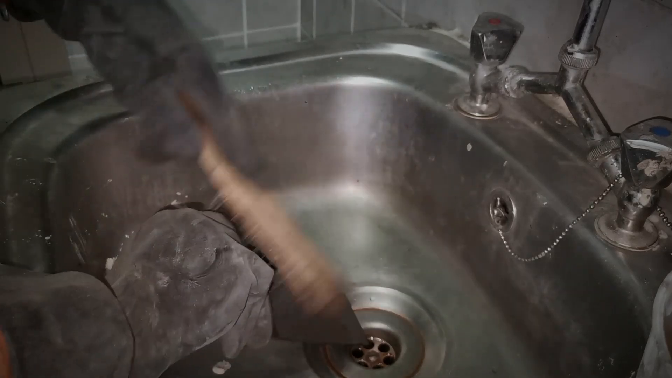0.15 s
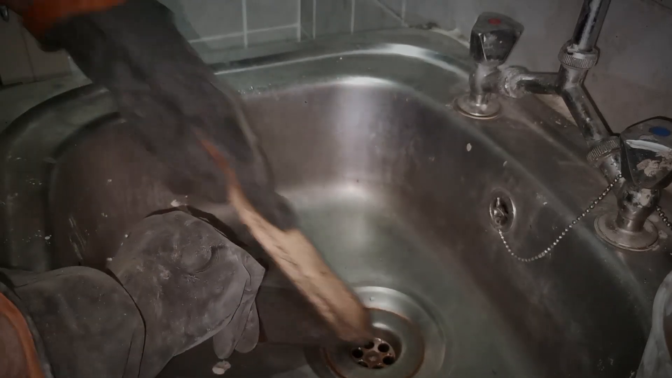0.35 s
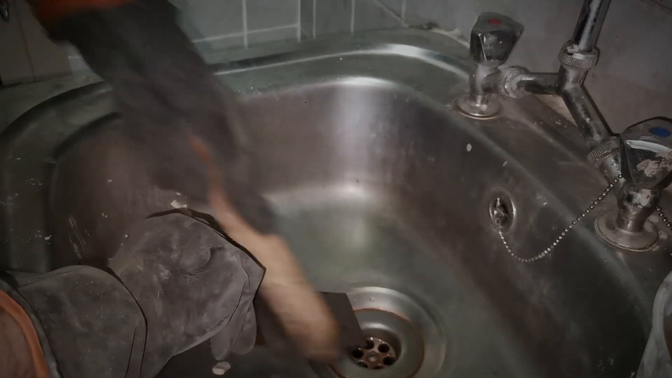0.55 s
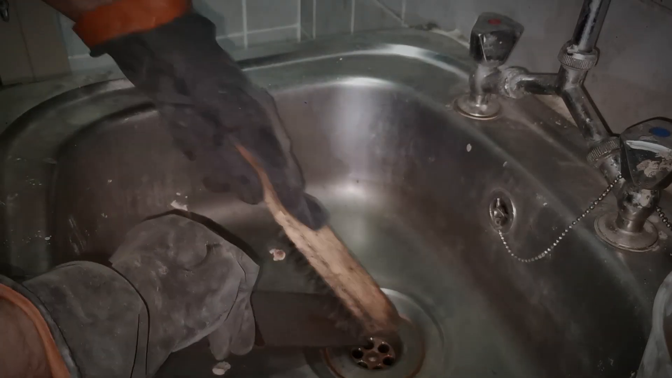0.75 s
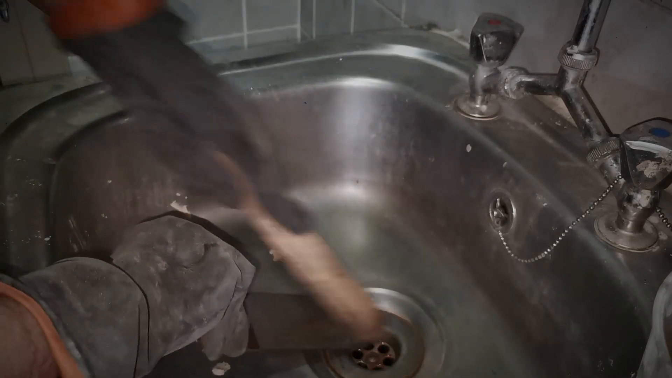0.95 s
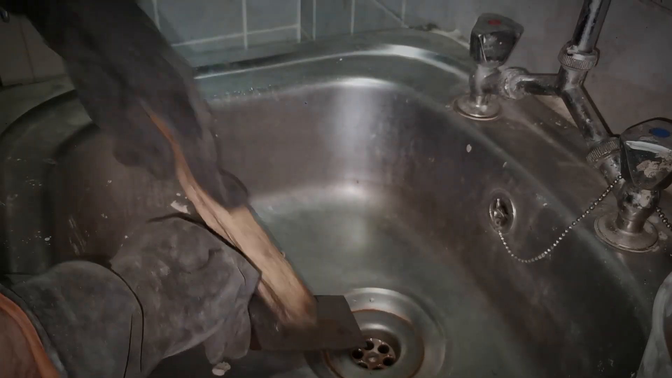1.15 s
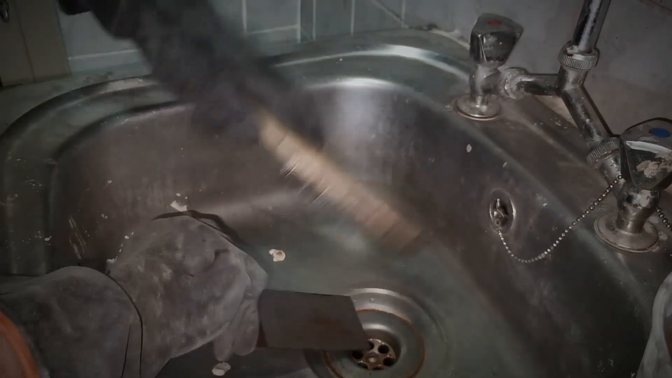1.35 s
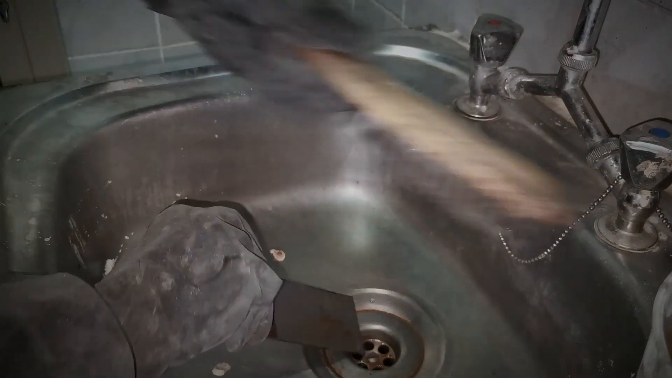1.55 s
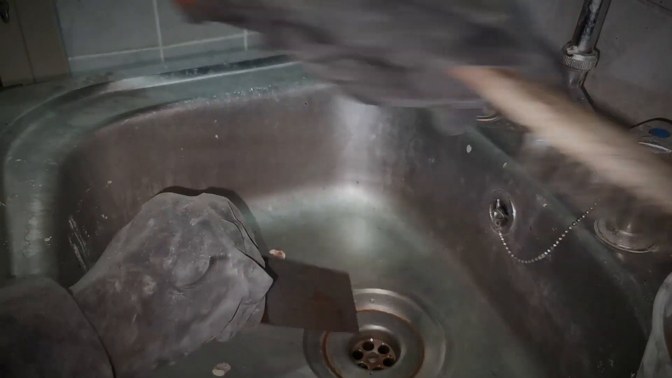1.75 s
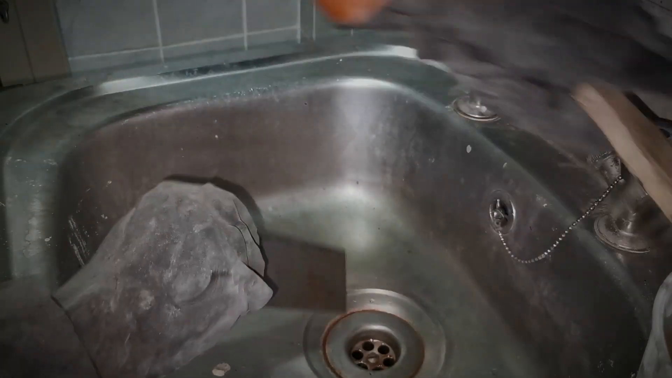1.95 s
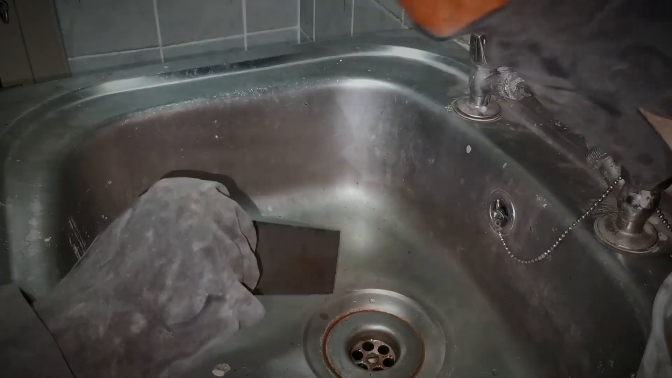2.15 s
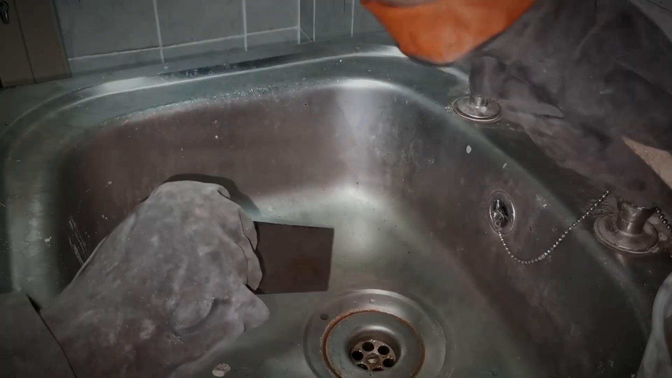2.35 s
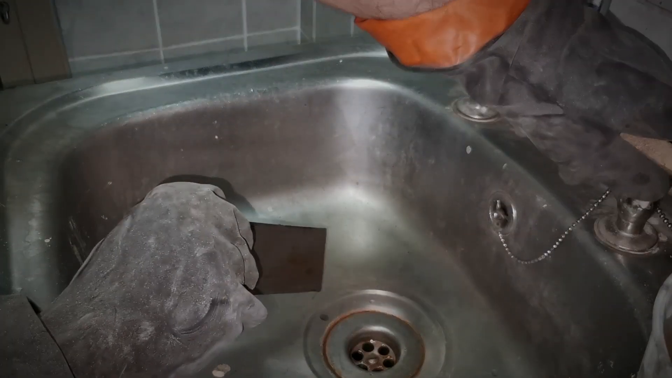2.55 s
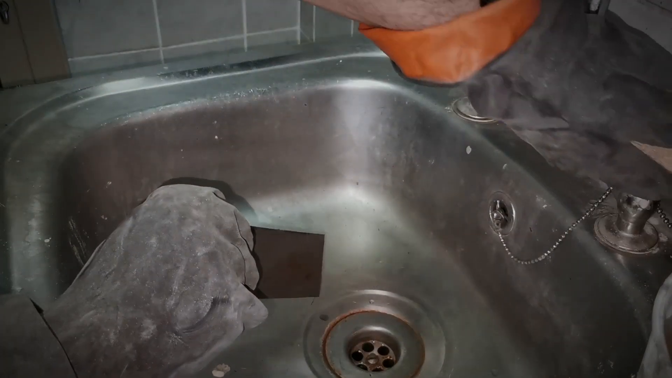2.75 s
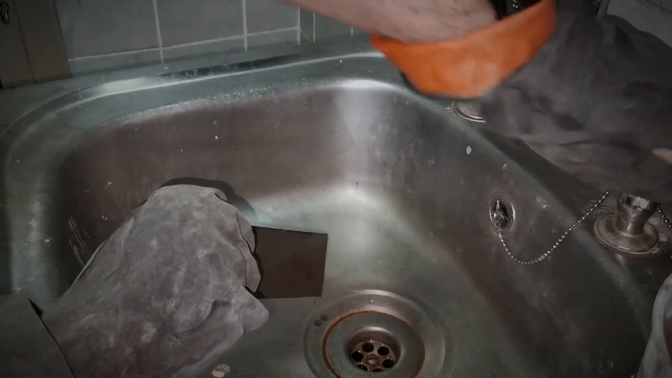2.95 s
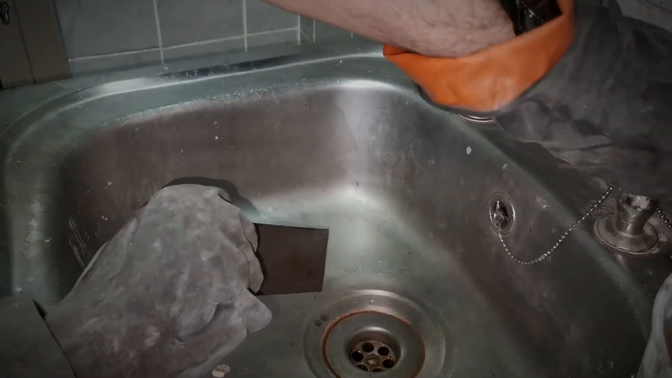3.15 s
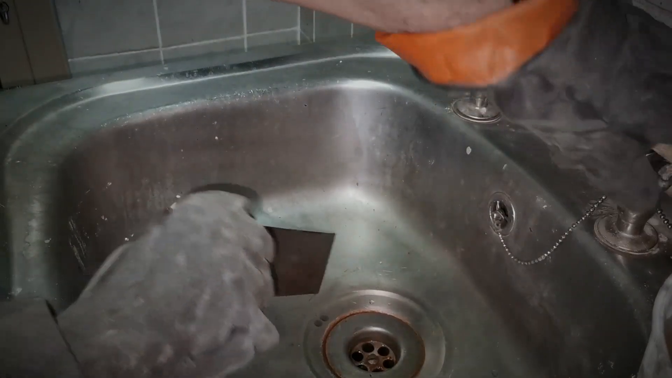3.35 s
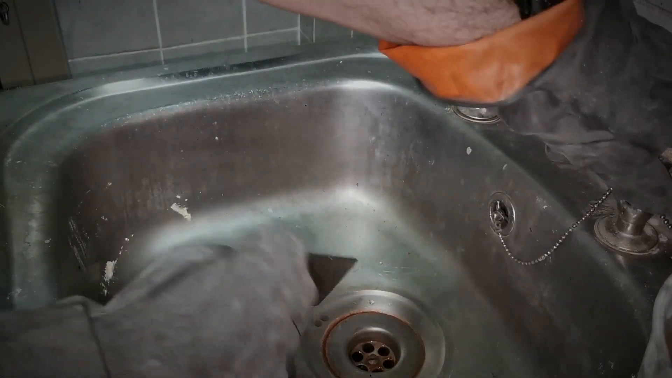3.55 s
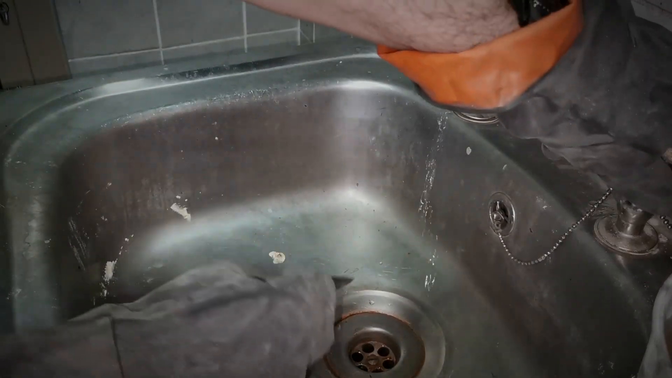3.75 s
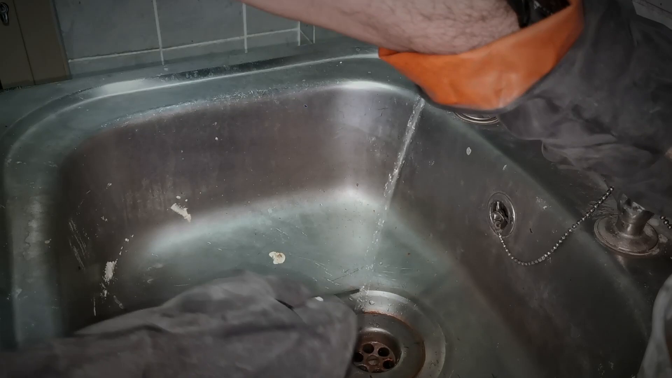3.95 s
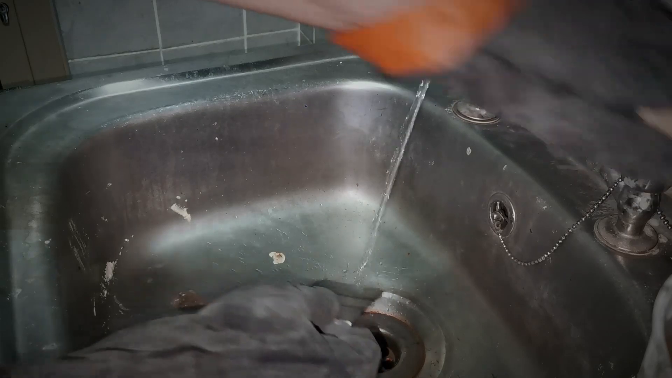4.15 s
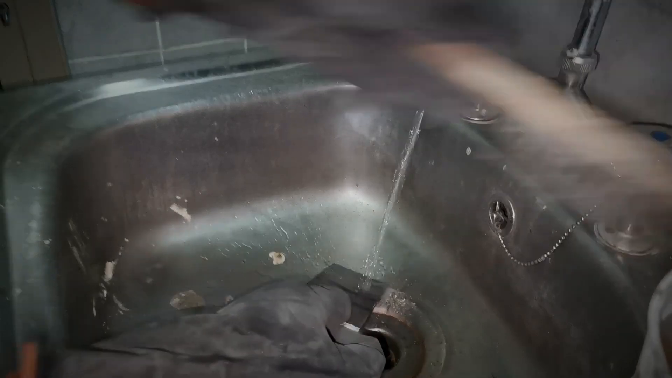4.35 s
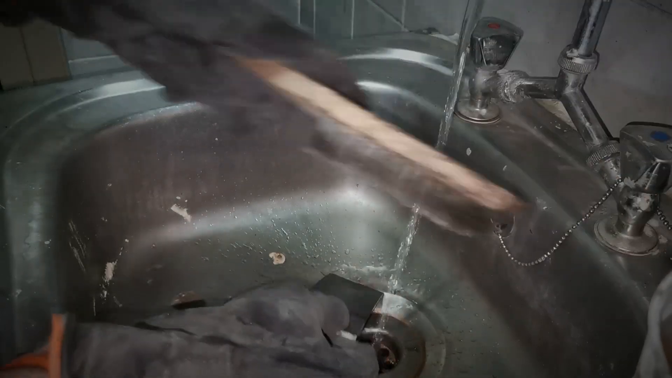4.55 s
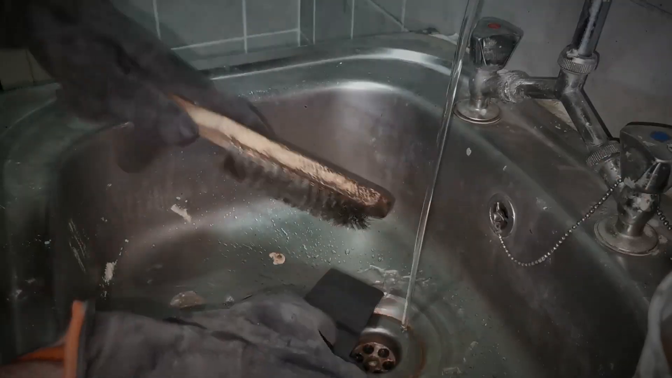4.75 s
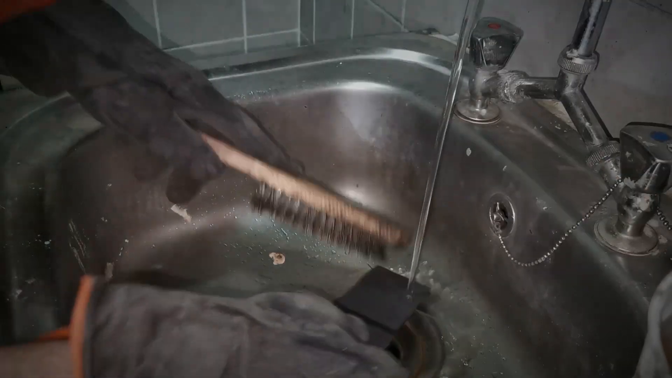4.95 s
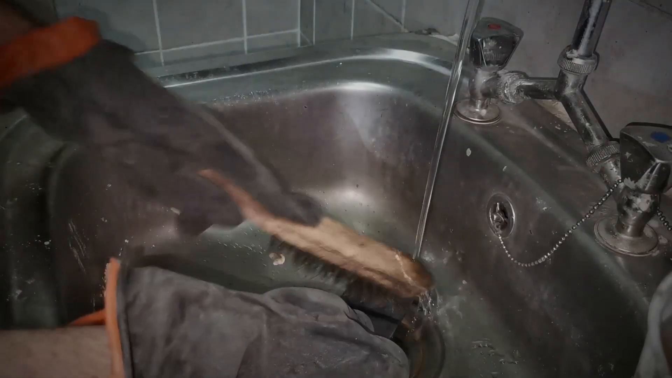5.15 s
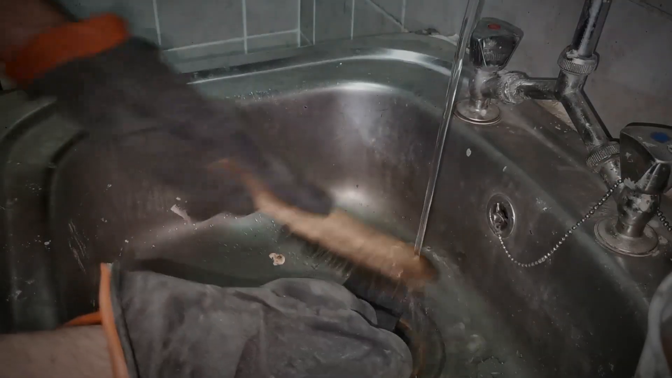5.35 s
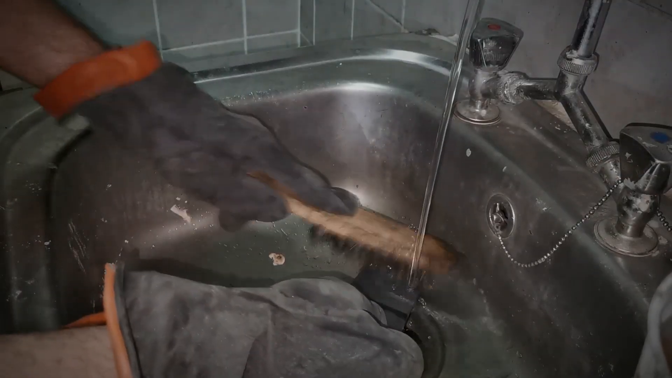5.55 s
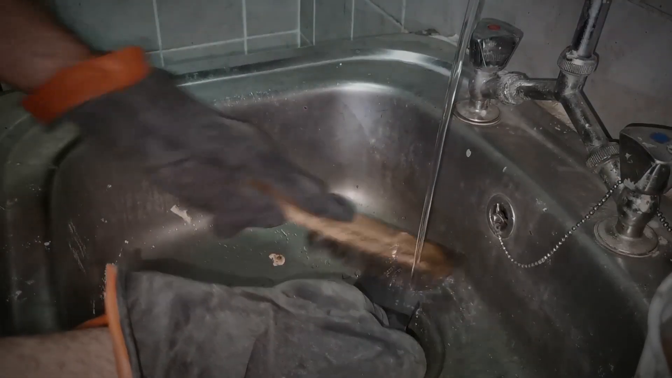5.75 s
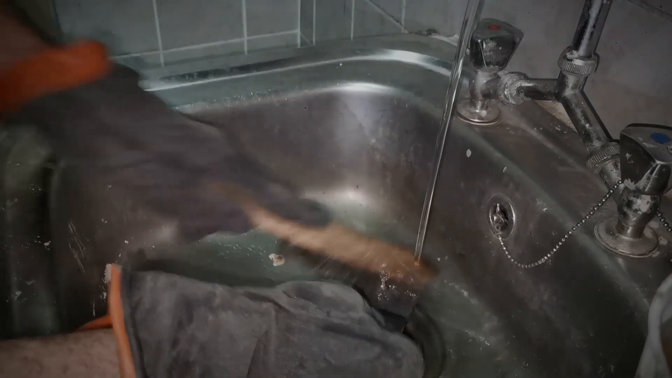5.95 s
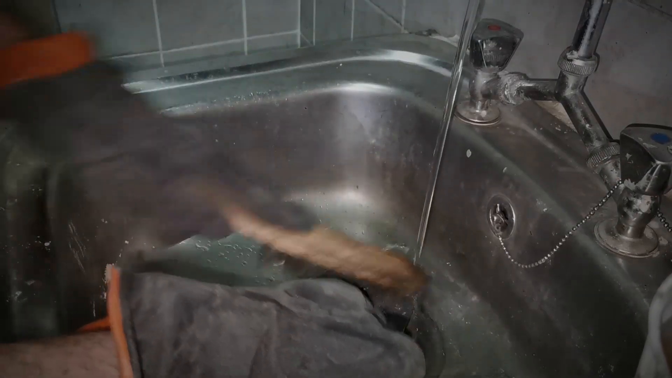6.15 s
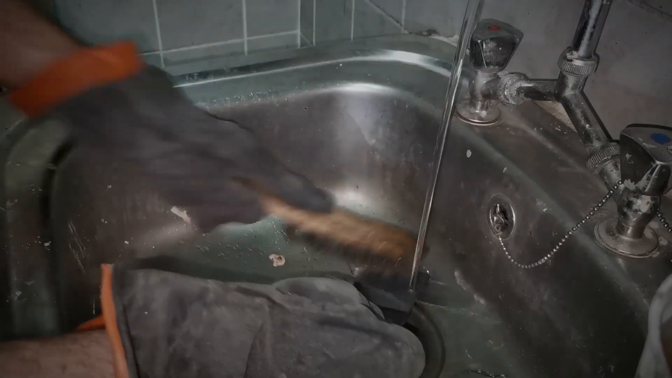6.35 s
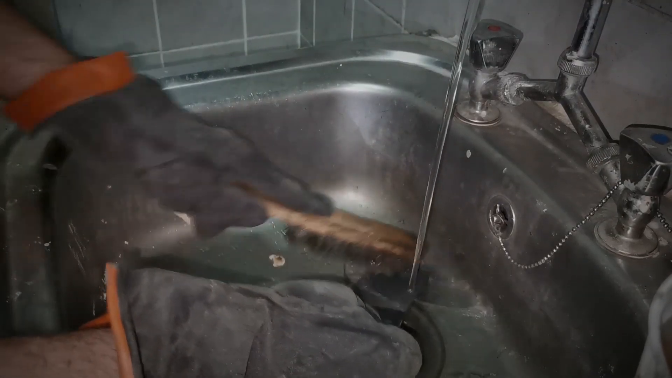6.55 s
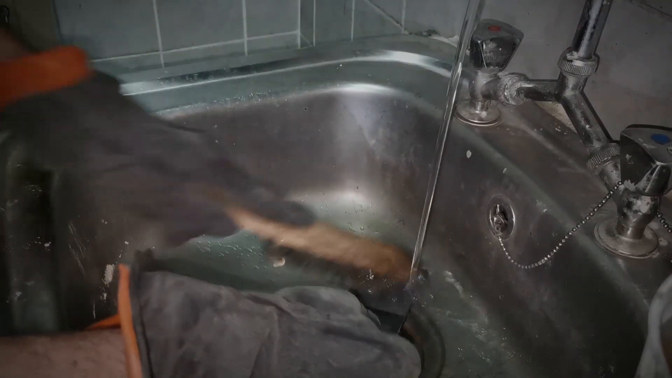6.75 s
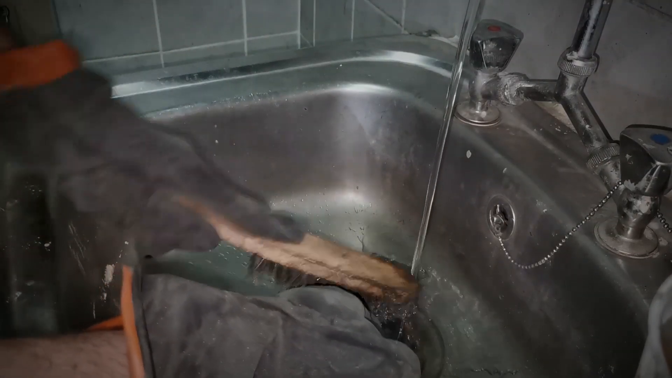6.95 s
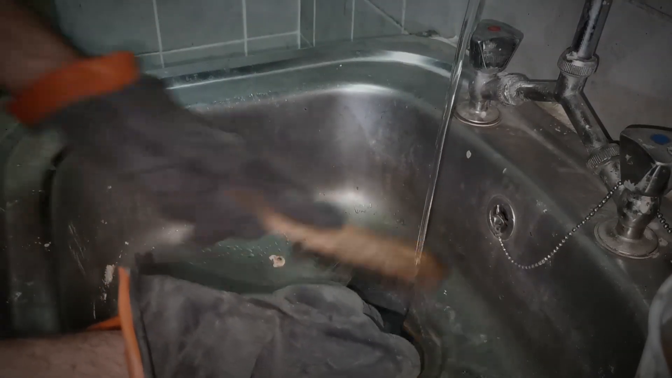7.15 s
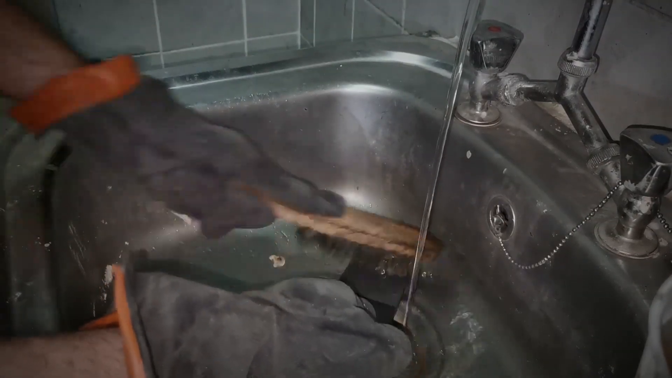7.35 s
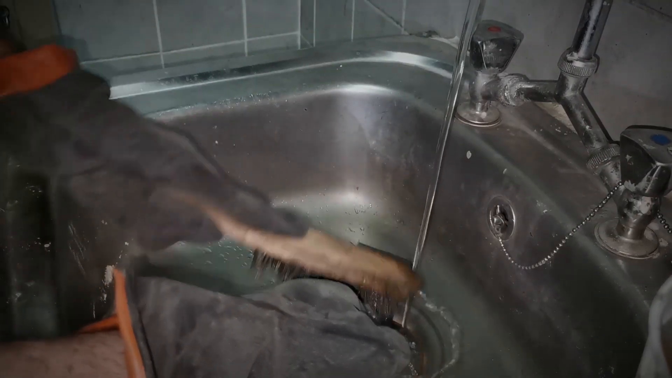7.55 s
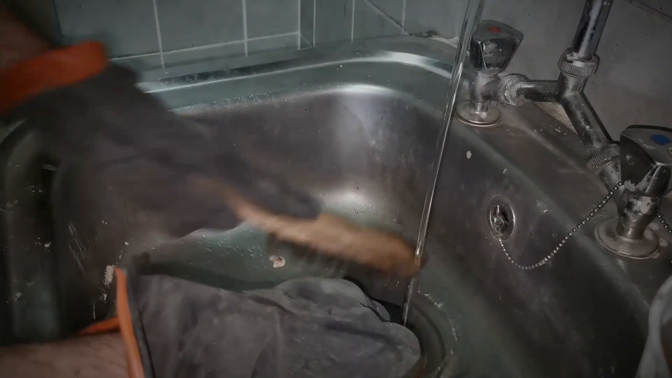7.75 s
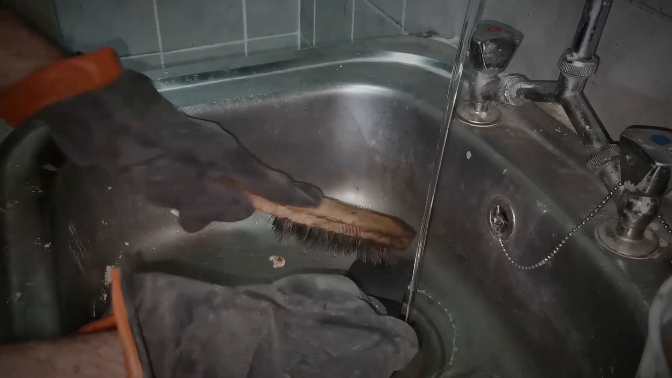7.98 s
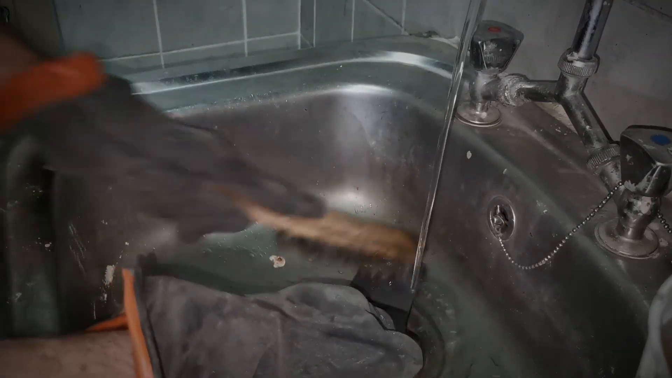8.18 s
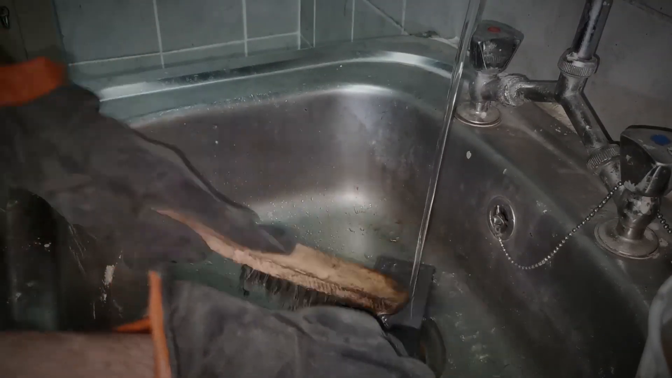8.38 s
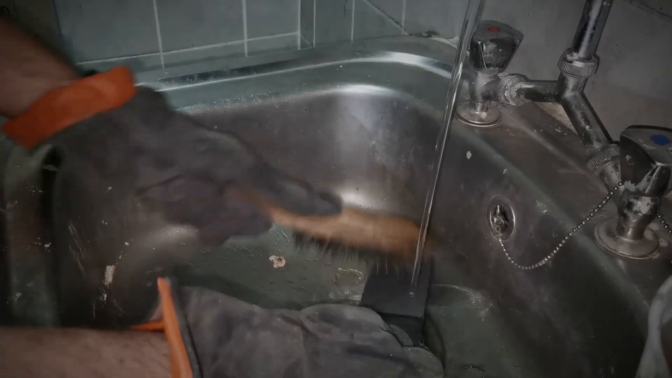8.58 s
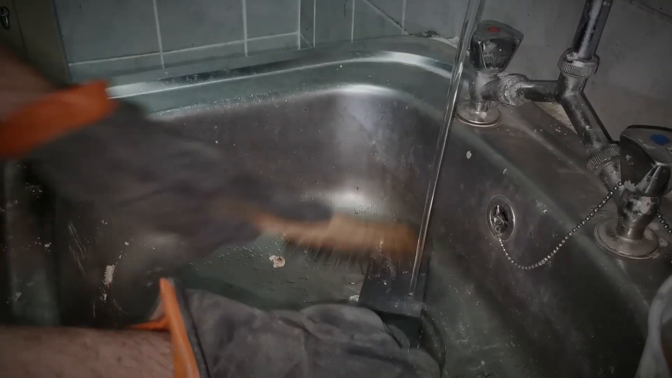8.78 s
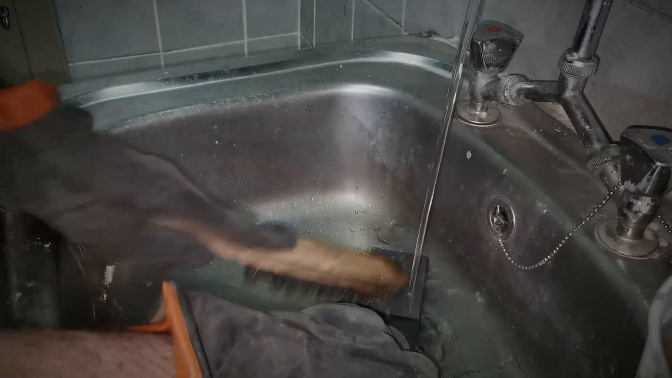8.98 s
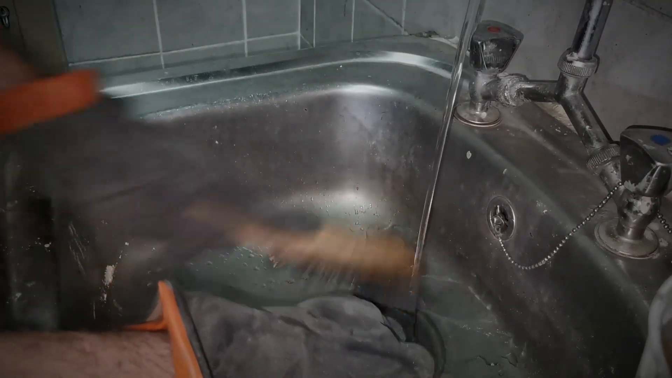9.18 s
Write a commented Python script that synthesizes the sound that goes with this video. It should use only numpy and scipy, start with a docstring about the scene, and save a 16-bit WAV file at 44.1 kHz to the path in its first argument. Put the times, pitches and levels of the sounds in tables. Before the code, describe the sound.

A close stereo microphone hears a steel sink in a small tiled room with low rumble. At about 0.2 s a strong hollow knock lands, then from 0.35 to 1.45 s seven dry wire-brush strokes rasp over a steel plate, hissing brightly while the basin drums beneath, with a tiny squeal near 0.75 s. A quieter pause follows: gloves rustle, the plate slides around 2.1 to 2.6 s, and a dull clunk sounds at 3.1 s. At 4.07 s a thin tap stream begins pattering and stays on. A scrape at 4.4 s, a hard knock at 4.65 s, a sharp tick at 4.8 s and another bang near 5.15 s lead into steady scrubbing from 5.3 s to the end, about seven or eight strokes a second, heaviest around 7.3 s, with brief wire squeals, ticks and small basin bumps.

```python
"""Wire brush on steel in a sink

Tiled room, a stainless sink at close range, two microphone ports: a gloved hand scrubs a small steel plate.
Wire tips catch and snap free as coloured noise grains, a few squeal as sines, and the plate drums the basin's
modes. In the pause gloves rustle, the plate slides and knocks, and the tap opens to a thin stream that then
stays on. Filtered noise makes the short ring of the tiles and a low background rumble."""
import sys
import numpy as np
from scipy import signal
from scipy.fft import rfft, irfft
from scipy.io import wavfile
from scipy.ndimage import uniform_filter1d, map_coordinates

SR = 44100
rng = np.random.default_rng(int(sys.argv[2]) if len(sys.argv) > 2 else 0)


def materialize(psi):
    """Save the field psi as 16-bit PCM at rate SR to the path in sys.argv[1].

    A 1-D psi becomes a single channel; in a 2-D psi each row is a channel.
    """
    bounded = np.clip(np.atleast_2d(psi).T, -1, 1)
    quanta = np.round(bounded * 32767).astype(np.int16)
    wavfile.write(sys.argv[1], SR, quanta)


N = 406602
TIME = np.arange(N) / SR  # [s]
HALF_SECOND = SR // 2  # length of every impulse response [samples]


def amp(db):
    """Amplitude factor of a level in dB."""
    return 10 ** (np.asarray(db) / 20)


def unit(x):
    """Scale to rms 1."""
    return x / np.sqrt(np.mean(x ** 2))


def blow_unit(x):
    """Scale so that the first twentieth of a second has rms 1."""
    return x / np.sqrt(np.mean(x[..., :SR // 20] ** 2))


def unit_energy(response):
    """Scale a stereo response so that it keeps the level of noise."""
    return response / np.sqrt(np.sum(response ** 2) / 2)


def through(x, response):
    """Play a sound through an impulse response."""
    return signal.oaconvolve(np.atleast_2d(x), np.atleast_2d(response), axes=-1)[:, :x.shape[-1]]


def colour(x, spectrum, size=4096):
    """Causal minimum-phase filter with a (frequency [Hz], level [dB]) spectrum."""
    hz, db = np.transpose(spectrum)
    grid = np.maximum(np.fft.rfftfreq(size, 1 / SR), 1)
    level_db = np.interp(np.log(grid), np.log(hz), db)
    # folding the cepstrum forward in time makes the filter causal
    cepstrum = irfft(np.log(amp(level_db)))
    cepstrum[1:size // 2] *= 2
    cepstrum[size // 2 + 1:] = 0
    return through(x, irfft(np.exp(rfft(cepstrum))))


def fade(t60):
    """Half a second of exponential decay, falling 60 dB in t60 seconds."""
    return np.exp(-np.log(1000) * TIME[:HALF_SECOND] / t60)


def ring(modes):
    """Impulse response of a set of modes, each a decaying sine."""
    return sum(amp(db) * fade(t60) * np.sin(2 * np.pi * hz * TIME[:HALF_SECOND]) for hz, db, t60 in modes)


def wash(t60):
    """Countless overlapping modes and echoes as fading noise, different at each port; mean energy 1."""
    x = rng.standard_normal((2, HALF_SECOND)) * fade(t60)
    return unit_energy(x)


def snaps(rate, spread_db):
    """Random tiny impacts of uneven size and either sign, rate per second; rms 1."""
    size = amp(spread_db * np.minimum(rng.exponential(size=N), 4))
    struck = rng.random(N) < rate / SR
    return unit(struck * size * rng.choice([-1, 1], N))


def grains(rate, spread_db, t60):
    """Each tiny impact sets off its own short burst of noise, different at the two ports; rms 1."""
    power = through(snaps(rate, spread_db) ** 2, fade(t60) ** 2)
    return unit(np.sqrt(np.abs(power)) * rng.standard_normal((2, N)))


def walk(rate):
    """Random wander with a spread near 1, rate steps per second; after 4096 steps it holds still."""
    knots = rng.standard_normal(4096)
    return np.interp(TIME * rate, np.arange(len(knots)), knots)


def roam(x, depth_db, rate, per_octave, size=512):
    """As the contact point moves, it favours now one group of resonances, now another; rms 1."""
    hz, s, frames = signal.stft(x, SR, nperseg=size)
    place = np.meshgrid(per_octave * np.log2(1 + hz / 50), rate * s, indexing="ij")
    shift = map_coordinates(rng.standard_normal((128, 512)), place, order=1, mode="wrap")
    favoured = frames * amp(depth_db * np.clip(shift, -2, 1))
    return unit(signal.istft(favoured, SR, nperseg=size)[1][:, :N])


def arch(length, peak):
    """Swell from rest to 1 and back, highest at the given share of its length [s]."""
    u = np.linspace(0, 1, max(int(length * SR), 8))
    bend = np.log(.5) / np.log(np.clip(peak, .1, .9))
    return np.abs(np.sin(np.pi * u ** bend))


def add(out, s, x):
    """Mix x in at time s."""
    i = max(int(s * SR), 0)
    out[..., i:i + x.shape[-1]] += x[..., :max(N - i, 0)]


# modes of the steel basin: (frequency [Hz], relative level [dB], t60 [s])
BASIN_MODES = [(69.5, 1, 0.61), (134.7, 3.5, 0.22), (185, -4, 0.097), (223, 4.5, 0.19), (250, 2, 0.18),
               (294.5, -0.5, 0.28), (328, -24.5, 0.044), (412.5, -5.5, 0.25), (475, -22, 0.31),
               (528.5, -10, 0.2), (598.4, -14, 0.18), (662.5, -7.5, 0.15), (706, -7.5, 0.39),
               (666, -8, 0.13), (770, -59.5, 0.35), (870, -36.5, 0.11), (903, -21.5, 0.089),
               (962, -26, 0.45), (1119, -14, 0.23), (1370, -13, .22), (1512, -20.5, 0.65),
               (1920, -47.5, 0.14), (2010, -9, 0.089), (2234, -14, 0.28)]


def basin_response():
    """Low modes reach both ports alike, the crowd of higher ones by many paths."""
    modes = ring(BASIN_MODES)
    crowd = colour(wash(t60=0.21), [(60, -16.5), (130, -3.0), (250, 6), (500, -5.5),
                                    (900, -11.0), (2000, -18), (5000, -32)])
    return unit_energy(np.vstack([modes, modes])) + amp(-10.5) * unit_energy(crowd)


# the quiet background with the sink at rest: (frequency [Hz], relative level [dB])
QUIET_SPECTRUM = [(25, -55), (70, -60.5), (135, -59), (220, -83.5), (400, -77), (700, -79), (1000, -86.5),
                  (1500, -92.5), (2300, -99.5), (3300, -104), (5000, -107), (7000, -112), (10000, -113),
                  (15000, -111)]


def background():
    """Low rumble, alike at both ports, under a faint hiss that differs between them."""
    rumble = colour(rng.standard_normal(N), QUIET_SPECTRUM) * amp(0.73 * walk(rate=11))
    apart = colour(rng.standard_normal((2, N)), QUIET_SPECTRUM)
    apart = colour(apart, [(30, -17.5), (150, -39), (600, -8.0), (2000, 12.5)])
    return amp(-46) * unit(rumble + apart)


def movements(rows):
    """Level of (time [s], length [s], level [dB]) hand movements, each swelling from rest and back."""
    out = np.zeros(N)
    for s, length, db in rows:
        add(out, s, amp(db) * unit(arch(length, peak=0.3)))
    return out


# a glove rubs: (time [s], length [s], relative level [dB])
GLOVE_RUBS = [(0, 0.1, -53.5), (1.45, 0.98, -62.5), (2.1, 0.18, -47), (2.24, 0.29, -45),
              (2.6, 0.069, -52.5), (3.375, 0.061, -46.5), (3.45, 0.078, -49), (3.54, 0.19, -52.5),
              (4.08, 0.9, -53), (4.375, 0.07, -35.5), (4.74, 0.16, -50), (5.21, 0.096, -41)]
# the plate slides on the basin floor; the rows at 2.63 s and 3.06 s are low bumps that swell in the basin: #
# (time [s], length [s], relative scrape level [dB], relative basin rumble level [dB])
PLATE_SLIDES = [(0, .1, -52.5, -43), (0.277, 0.15, -44, -25), (1.422, 0.41, -41.5, -38),
                (2.106, 0.12, -43, -34), (2.232, 0.41, -46, -33.5), (2.63, 0.12, -63, -27.5),
                (3.06, 0.12, -62, -20.5), (3.15, .4, -50, -35.5), (3.61, 0.35, -48, -38),
                (4.014, .28, -52, -33), (4.419, 0.095, -33.5, -35), (4.71, 0.16, -39.5, -32.5),
                (5.176, .14, -32, -26.5), (5.856, 1.3, -44.5, -45), (7.504, 0.85, -44, -41),
                (8.396, 0.57, -41.5, -35.5), (8.963, 0.57, -40.5, -52)]
# colours of the glove and of the sliding plate: (frequency [Hz], relative level [dB])
RUSTLE_SPECTRUM = [(1200, 3), (3000, -1.5), (5000, 8), (7000, 4.5), (10000, 0.5), (16000, 2.5)]
SCRAPE_SPECTRUM = [(200, 1), (550, 11.5), (1000, 1.5), (1600, -13), (2400, -6.5), (4000, -21.5)]


def handling(basin):
    """Leather and plate slide in small slips, which also stir the basin."""
    s, length, scrape_db, rumble_db = np.transpose(PLATE_SLIDES)
    rustle = movements(GLOVE_RUBS)
    scrape = movements(zip(s, length, scrape_db))
    # the hand resting on the basin keeps a little rumble going
    rumble = amp(-43.5) + movements(zip(s, length, rumble_db))
    slips = roam(grains(rate=1400, spread_db=8.0, t60=0.19), depth_db=3.5, rate=18, per_octave=6.9)
    slips = slips * amp(0.51 * walk(rate=70))
    stir = colour(through(snaps(rate=600, spread_db=2.5), basin),
                  [(70, -22.5), (140, 2.5), (250, -2), (450, -3.0), (1000, -21.5), (3000, -69)])
    stir = roam(stir, depth_db=10.5, rate=5.2, per_octave=11.0, size=2048)
    glove = amp(-1.5) * rustle * unit(colour(slips, RUSTLE_SPECTRUM))
    plate = amp(-8.0) * scrape * unit(colour(slips, SCRAPE_SPECTRUM))
    return glove + plate + amp(-12.0) * rumble * stir


# brush or plate knocks on the basin:
# (time [s], thud level [dB], relative clank level [dB], crack level [dB])
BASIN_KNOCKS = [(0.2234, -14.5, -34, -29.5), (0.3284, -31.5, -66, -54), (0.5024, -28.5, -44, -38),
                (.612, -28, -47, -54), (0.6553, -30.5, -56, -47), (0.7383, -29.5, -43, -46),
                (1.026, -26.5, -44, -44.5), (1.195, -27.5, -66, -62), (2.2568, -40, -67, -66),
                (2.6508, -44.5, -65, -78), (3.0641, -35.5, -61, -84), (3.971, -26.5, -40, -58),
                (4.424, -32, -39.5, -46), (4.6465, -13, -24, -34.5), (4.979, -38, -42, -69),
                (5.1383, -18, -24.5, -45), (6.081, -32, -45, -46), (6.465, -44, -45.5, -59),
                (6.7001, -31, -47, -51), (6.985, -47, -43.5, -48), (7.2428, -30.5, -44, -49),
                (7.877, -28.5, -55, -48), (7.9201, -40, -40, -53)]
# colours of the three parts of a knock: (frequency [Hz], relative level [dB])
THUD_SPECTRUM = [(40, -29), (140, 0), (420, 2.5), (600, -14.5), (1200, -32), (4000, -47)]
CLANK_SPECTRUM = [(200, -35.5), (450, 8), (600, 5), (760, -4), (1000, 0), (1600, -1.5), (2400, 0),
                  (3500, -7), (8000, -19.5)]
CRACK_SPECTRUM = [(1000, -31), (2800, -3.5), (5000, 3), (7500, 0), (10000, -4.5), (16000, -20.5)]


def knocks(basin):
    """A blow rings the basin's low modes, its dense upper modes, and cracks at the contact."""
    out = np.zeros((2, N))
    thud = blow_unit(colour(basin, THUD_SPECTRUM))
    upper = unit_energy(colour(basin, CLANK_SPECTRUM))
    # the bending wave takes a moment to fill the sheet
    spread = 1 - np.exp(-TIME[:HALF_SECOND] / .002)
    for s, thud_db, clank_db, crack_db in BASIN_KNOCKS:
        dense = unit_energy(colour(spread * wash(t60=0.18), CLANK_SPECTRUM))
        clank = blow_unit(amp(3.5) * upper + dense)
        crack = blow_unit(colour(spread * wash(t60=0.054), CRACK_SPECTRUM))
        add(out, s, amp(thud_db) * thud + amp(clank_db) * clank + amp(crack_db) * crack)
    return out


# dull clunks of the tap handle or the plate's edge:
# (time [s], main ring frequency [Hz], its t60 [s], level [dB])
DULL_CLUNKS = [(0.229, 727, 0.31, -25), (1.979, 1300, 0.0032, -47.5), (2.649, 458, 0.39, -35.5),
               (3.104, 656, 0.031, -18.5), (3.115, 860, 0.024, -28.5), (3.606, 623, .036, -30.5),
               (3.654, 904, 0.078, -37.5), (4.655, 729, 0.15, -28), (4.984, 882, 0.3, -41),
               (5.155, 500, 0.28, -39), (6.699, 1018, 0.1, -40)]
# modes of the sink top around the tap: (frequency [Hz], relative level [dB], t60 [s])
SINK_TOP_MODES = [(147.7, 2, 1), (174, -19, 0.91), (226, -19.5, 0.81), (473, -14, 0.51), (610, -9.5, 0.013),
                  (720, 5, 0.2), (816, -4.5, 0.1), (841, -15.5, 0.45), (960, -30.5, 0.41), (1096, -39, 0.1),
                  (1430, -17, 0.37), (1970, -18, 0.12)]
# colour of the spreading clunk: (frequency [Hz], relative level [dB])
CLUNK_SPECTRUM = [(100, -20), (250, -13), (400, -4), (680, 0), (1000, -5), (1500, -16.5), (2300, -23),
                  (3300, -34), (4500, -40), (6000, -41), (15000, -60.5)]


def clunks():
    """A blunt contact rings once in its own pitch and spreads into the sink top."""
    out = np.zeros((2, N))
    both_ports = np.ones((2, 1))
    body = unit_energy(ring(SINK_TOP_MODES) * both_ports)
    for s, hz, t60, db in DULL_CLUNKS:
        contact = unit_energy(ring([(hz, 0, t60)]) * both_ports)
        longer = colour(wash(t60=0.21), [(1000, -2.0), (2500, -4)])
        spread = unit_energy(colour(wash(t60=0.099) + amp(10.5) * longer, CLUNK_SPECTRUM))
        add(out, s, amp(db) * blow_unit(body + amp(1.0) * contact + amp(4) * spread))
    return out


def stroke_lengths():
    """The brush turns straight into the next stroke, unless a rest follows; lengths in seconds."""
    gaps = np.diff([s for s, *_ in BRUSH_STROKES], append=np.inf)
    # within a bout a stroke runs on 6 ms past the turn; before a rest it lasts 0.11 s
    return np.where(gaps < .3, gaps + 0.006, 0.11)


def effort(peak, levels_db, sharpness, rest, flip):
    """Level of a layer over all strokes; bent wires keep some contact at each turn, then flip in a burst."""
    out = np.zeros(N)
    flip_s = 0.016  # delay after the turn, and decay of the burst [s]
    for (s, *_), length, db in zip(BRUSH_STROKES, stroke_lengths(), levels_db):
        swell = arch(length, peak) ** sharpness
        since_flip = TIME[:len(swell)] - flip_s
        burst = (since_flip > 0) * np.exp(-np.abs(since_flip) / flip_s)
        add(out, s, amp(db) * unit(rest + swell + flip * burst))
    return uniform_filter1d(out, SR // 400)


def jolts(basin, pressure):
    """Now and then the pressed plate jumps and bumps the basin, harder under more pressure."""
    jolts_per_s, against_drumming_db = 12, -11.5
    bumps = (rng.random(N) < jolts_per_s / SR) * pressure * amp(against_drumming_db)
    thud = blow_unit(colour(basin, THUD_SPECTRUM))
    clank = blow_unit(colour(basin, CLANK_SPECTRUM))
    return through(bumps, thud + amp(-2.0) * clank)


# brush strokes, each lasting until the next begins or a rest follows:
# (time [s], wire hiss level [dB], relative basin drumming level [dB], relative boom level [dB])
BRUSH_STROKES = [(0.355, -31.5, -36, -63), (.605, -26.5, -35, -35), (0.73, -29.5, -33, -55),
                 (0.864, -30.5, -31, -33.5), (1.015, -32.5, -35.5, -43.5), (1.185, -31.5, -29.5, -40),
                 (1.327, -35, -30, -47), (5.285, -39, -40.5, -43), (5.434, -33, -32.5, -27.5),
                 (5.562, -33.5, -36, -37), (5.689, -30, -31, -29.5), (5.807, -31.5, -33, -37),
                 (5.947, -31, -31.5, -29.5), (6.059, -33, -39.5, -39), (6.217, -32.5, -33, -32.5),
                 (6.335, -32.5, -38.5, -46), (6.485, -34, -36.5, -36.5), (6.612, -34.5, -38.5, -36),
                 (6.74, -34, -34, -35.5), (6.877, -33.5, -38, -39), (6.992, -31, -32, -28.5),
                 (7.132, -31, -34.5, -32.5), (7.252, -29.5, -25, -36), (7.405, -27.5, -26, -55),
                 (7.537, -31, -28.5, -32), (7.683, -31.5, -38.5, -41), (7.836, -32, -27.5, -40),
                 (7.994, -33.5, -43, -45), (8.131, -32, -27, -33), (8.275, -32, -40.5, -40.5),
                 (8.408, -34.5, -37.5, -40.5), (8.553, -36.5, -40, -46.5), (8.714, -33.5, -34.5, -32.5),
                 (8.86, -36, -49.5, -47.5), (9.003, -32.5, -36.5, -39), (9.144, -36, -43.5, -43)]
# colours of wire tips, dragged tuft and drummed basin: (frequency [Hz], relative level [dB])
HISS_SPECTRUM = [(3000, -43.5), (6500, -6), (8200, -1), (10000, 0.5), (13000, 2), (16000, -1)]
RASP_SPECTRUM = [(400, -18.5), (900, -21), (1500, -14), (2300, 0.5), (3300, -3.5), (5000, 4.5), (6800, 5),
                 (8500, -7.5), (13000, -36)]
DRUM_SPECTRUM = [(60, -17), (140, -23.5), (200, -2), (280, 3), (400, 0.5), (520, 1.5), (700, -10),
                 (1200, -6.5), (2500, -19), (6000, -69.5)]
# colour of the hiss until the plate is wet: (frequency [Hz], relative level [dB])
DRY_PLATE_SPECTRUM = [(3000, 4), (7000, 2.5), (9000, -0.5), (11000, -2), (16000, 0.5)]
FASTEST, HARDEST = 0.38, 0.4  # share of a stroke at which speed and pressure peak


def brush(basin):
    """Wire tips snap over the plate; the drag of the whole tuft shakes the basin."""
    _, hiss_db, drum_db, boom_db = np.transpose(BRUSH_STROKES)
    # the rasp lies 8 dB under the hiss, but follows the drumming by about a quarter
    rasp_db = hiss_db - 8 + 0.24 * (drum_db - hiss_db)
    pressure = effort(HARDEST, drum_db, sharpness=1.03, rest=0.37, flip=0.17)
    # tufts catch and let go together, so the treble flutters
    catch = amp(1.0 * walk(rate=73))

    tips = colour(grains(rate=2400, spread_db=3.0, t60=0.047), HISS_SPECTRUM)
    tips = roam(tips, depth_db=3.0, rate=62, per_octave=12)
    wet = flow()
    tips = wet * tips + (1 - wet) * colour(tips, DRY_PLATE_SPECTRUM)
    hiss = tips * catch * effort(FASTEST, hiss_db, sharpness=2.0, rest=.15, flip=0.092)

    # single stiff wires flick off the plate's edge and stand out of the drag as grit
    grit = grains(rate=180, spread_db=3.5, t60=0.022)
    drag = grains(rate=1800, spread_db=-4.0, t60=0.086) + amp(-3.5) * grit
    drag = roam(colour(drag, RASP_SPECTRUM), depth_db=5.5, rate=24, per_octave=7)
    rasp = drag * catch * effort(FASTEST, rasp_db, sharpness=0.76, rest=0.047, flip=0.21)

    judder = colour(through(snaps(rate=900, spread_db=2), basin), DRUM_SPECTRUM)
    judder = roam(judder, depth_db=12.5, rate=13, per_octave=4.103, size=2048)
    drum = judder * pressure + jolts(basin, pressure)

    # the lowest strong mode answers each push with a nearly pure boom
    unsteady = amp(2.5 * walk(rate=30))
    boom_hz = 138 + 10 * walk(rate=43)
    boom = unit(np.sin(2 * np.pi * np.cumsum(boom_hz) / SR) * unsteady)
    boom = boom * effort(HARDEST, boom_db, sharpness=1.96, rest=0.11, flip=0)
    return hiss + rasp + amp(-1.5) * drum + amp(2.5) * boom


# wires that lock into a squeal: (time [s], length [s], middle pitch [Hz], relative level [dB])
WIRE_SQUEALS = [(.743, .026, 7470, -37), (0.773, 0.033, 7200, -34), (4.46, 0.012, 5860, -47),
                (5.475, .045, 7900, -38), (6.09, .04, 7500, -40), (6.517, 0.034, 7550, -36),
                (6.76, .05, 7500, -40), (8.488, 0.04, 6710, -44.5), (8.784, 0.041, 7800, -37.5),
                (9.045, 0.059, 7500, -37)]


def squeals(count=3):
    """A few wires stick and slip together, each at its own pitch (wavering early on) and in broken bursts."""
    out = np.zeros((2, N))
    wire_spread = 0.034  # share by which the pitches of neighbouring wires differ
    for offset in np.linspace(-1, 1, count):
        # the pitch waver [Hz] runs out of steps after about 4.9 s and holds
        waver, flutter = 520 * walk(rate=830), amp(9.4 * walk(rate=200))
        for s, length, hz, db in WIRE_SQUEALS:
            swell = arch(length, peak=0.55)
            start = int(s * SR)
            span = slice(start, start + len(swell))
            pitch = hz * (1 + wire_spread * offset) + waver[span]
            phase = 2 * np.pi * np.cumsum(pitch) / SR
            add(out, s, amp(db) * unit(swell * flutter[span] * np.sin(phase)))
    return amp(4.5) * out / np.sqrt(count)


# wires flick, metal ticks and first drops land: (time [s], ring frequency [Hz], level [dB])
SHARP_TICKS = [(3.387, 10100, -44.5), (3.836, 2200, -60.5), (4.0848, 10600, -48.5), (4.1543, 9400, -53.5),
               (4.369, 8000, -47), (4.514, 7600, -50), (4.779, 7840, -43.5), (4.801, 4920, -31),
               (5.315, 11300, -44), (6.072, 11000, -44), (7.187, 2830, -41), (7.849, 10000, -40.5),
               (8.292, 8800, -38.5), (8.721, 10200, -45)]


def ticks():
    """Sharp little contacts, each with one broad resonance."""
    out = np.zeros((2, N))
    for s, hz, db in SHARP_TICKS:
        peak = [(hz / 2, -28), (hz / 1.23, -9), (hz, 0), (hz * 1.3, -9), (hz * 2, -13)]
        contact = wash(t60=0.0077) + amp(-0.5) * wash(t60=0.11)
        add(out, s, amp(db) * blow_unit(colour(contact, peak)))
    return out


def flow():
    """The tap opens quickly at 4.07 s, within 59 ms, and stays open (0-1)."""
    return np.clip((TIME - 4.07) / 0.059, 0, 1)


# colour of the stream on steel: (frequency [Hz], relative level [dB])
WATER_SPECTRUM = [(100, 19), (220, 16.5), (450, 16), (1100, 3), (2200, 8.5), (3300, 2.5), (5000, 4),
                  (10000, -0.5), (16000, 6)]


def water():
    """A thin stream patters on the steel once the tap is open."""
    patter = unit(colour(grains(rate=790, spread_db=3.0, t60=0.0076), WATER_SPECTRUM))
    return amp(-51.5) * flow() * patter


# the basin floor gives under a hard push: (time [s], length [s], level [dB])
FLOOR_HEAVES = [(5.447, 0.11, -35), (7.229, 0.11, -36), (8.73, 0.18, -35)]


def heaves():
    """The basin floor flexes in its lowest mode."""
    out = np.zeros(N)
    lowest_hz = BASIN_MODES[0][0]
    for s, length, db in FLOOR_HEAVES:
        swell = arch(length, peak=0.15)
        add(out, s, amp(db) * unit(swell * np.sin(2 * np.pi * lowest_hz * TIME[:len(swell)])))
    return out


def scene():
    """All sources in the basin, with the short ring of the tiled room."""
    basin = basin_response()
    tiles = colour(wash(t60=0.16), [(150, -12.5), (700, -2.5), (4000, 7.5), (14000, 1.5)])
    dry = handling(basin) + knocks(basin) + clunks() + brush(basin)
    dry = dry + squeals() + ticks() + water() + heaves()
    return dry + amp(-7.5) * through(dry, tiles) + background()


# resonances of the two microphone ports: (frequency [Hz], left level [dB], right level [dB])
MICROPHONE_PORTS = [(200, -.8, .8), (1000, 0, 0), (2300, 1.5, -1), (3000, 0, 0), (4300, -2, 2),
                    (5200, 0, 1), (6400, -2, 3), (7400, -5, 11), (8200, 2, 3), (9000, 11.5, -2),
                    (10700, 13, -.5), (12300, 7, -1), (14000, 2, 2), (15800, 3.5, .5)]


def record(dry):
    """Each microphone port adds its own treble resonance; peaks clip and the top is cut steeply."""
    ports = np.array(MICROPHONE_PORTS)
    heard = np.vstack([colour(dry[c], ports[:, [0, c + 1]]) for c in range(2)])
    top_cut = signal.ellip(12, .2, 70, 15850, fs=SR, output="sos")  # low-pass at 15850 Hz
    return signal.sosfilt(top_cut, np.clip(heard, -1, 1))


dry = scene()
out = record(dry)
materialize(out)
```